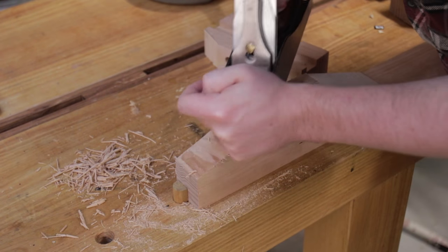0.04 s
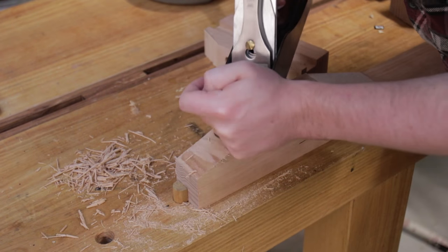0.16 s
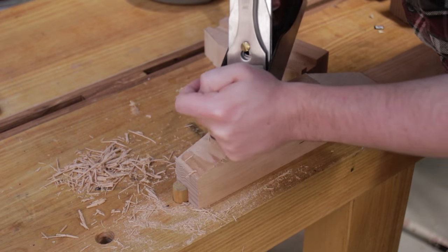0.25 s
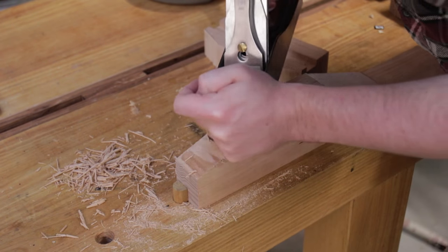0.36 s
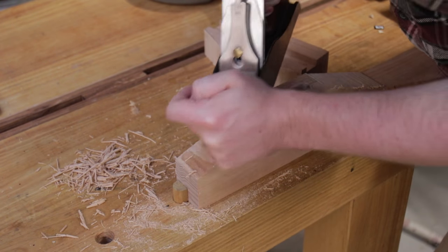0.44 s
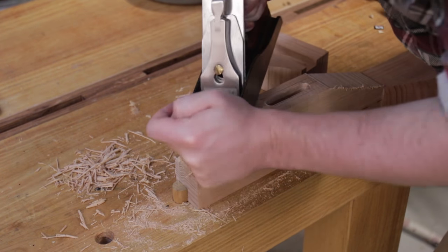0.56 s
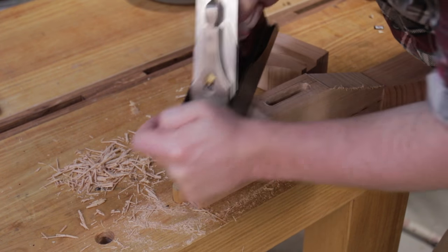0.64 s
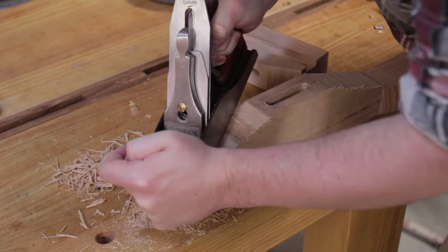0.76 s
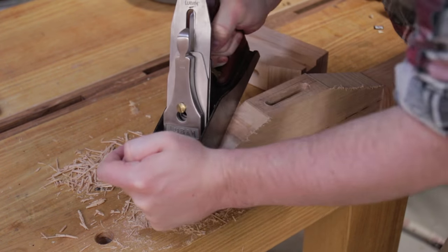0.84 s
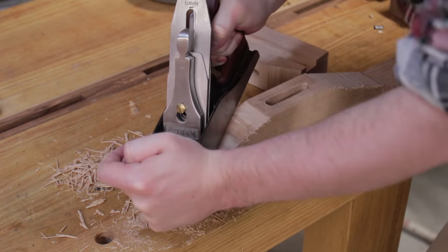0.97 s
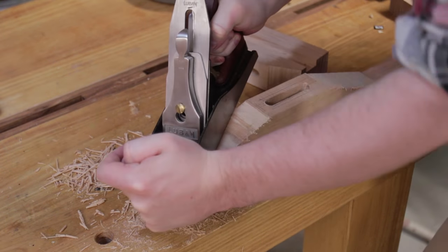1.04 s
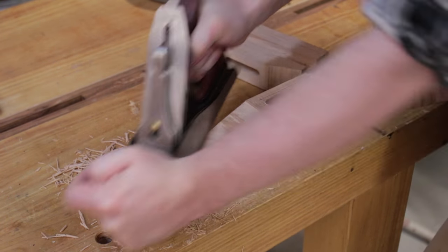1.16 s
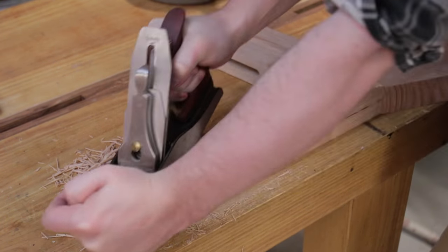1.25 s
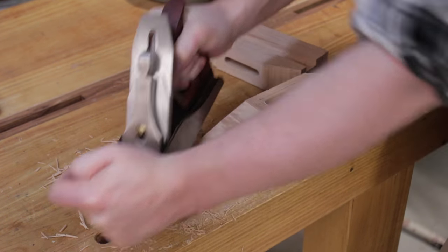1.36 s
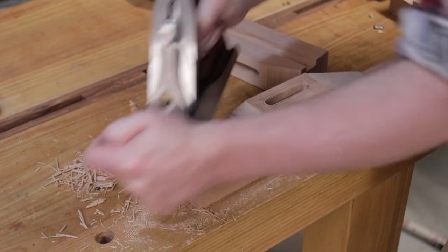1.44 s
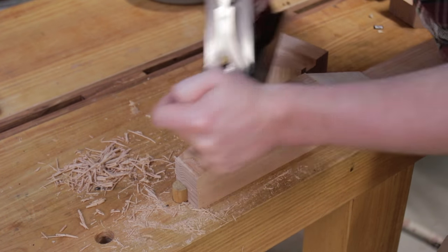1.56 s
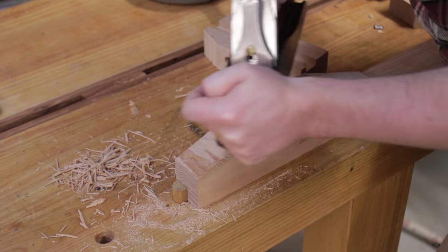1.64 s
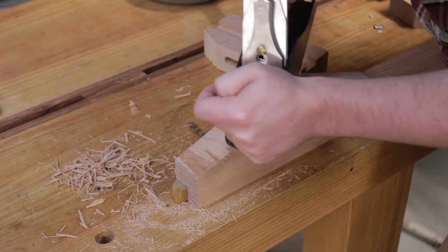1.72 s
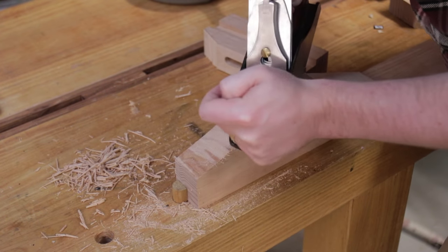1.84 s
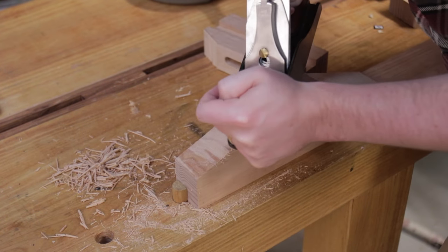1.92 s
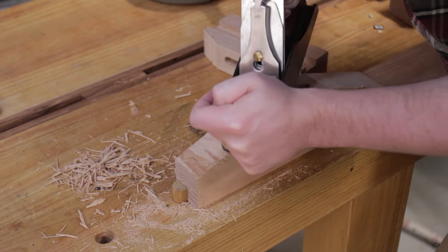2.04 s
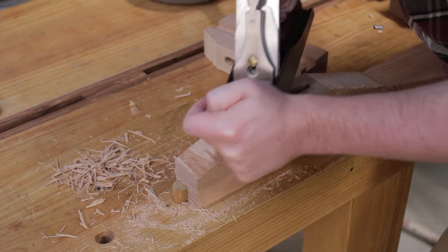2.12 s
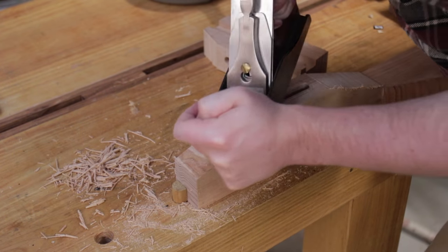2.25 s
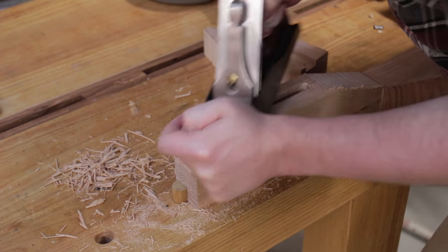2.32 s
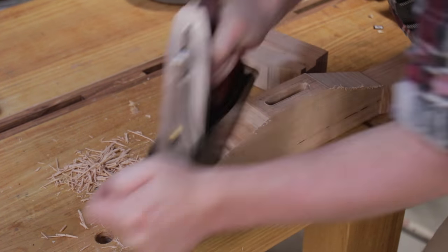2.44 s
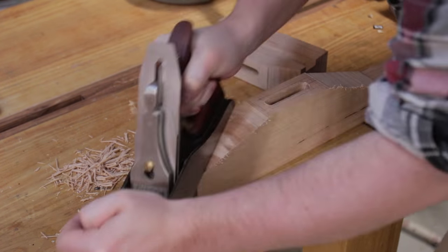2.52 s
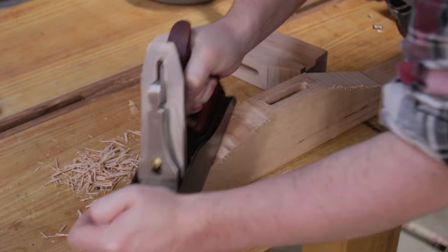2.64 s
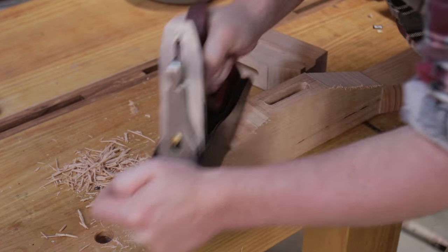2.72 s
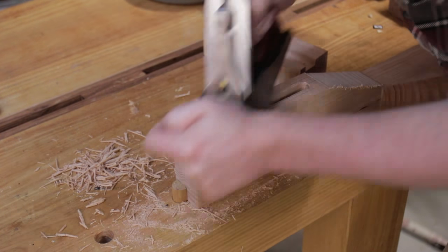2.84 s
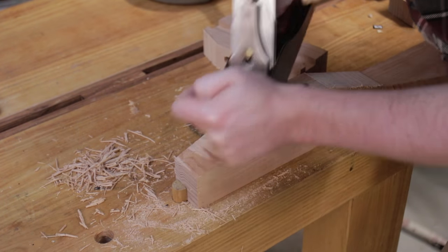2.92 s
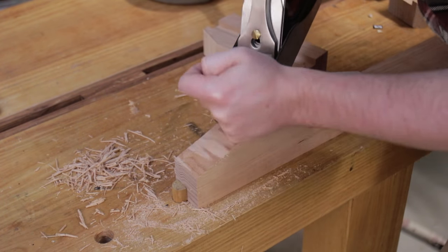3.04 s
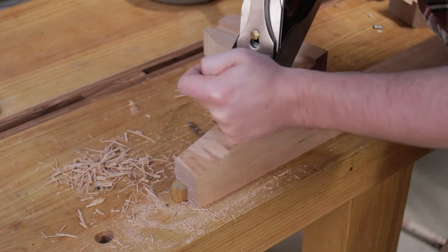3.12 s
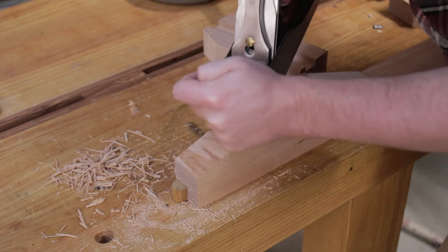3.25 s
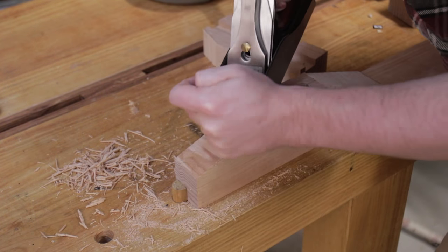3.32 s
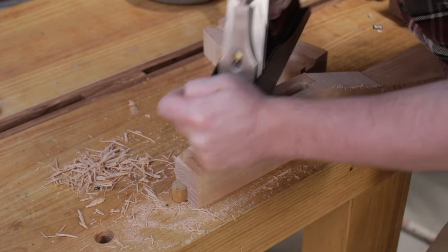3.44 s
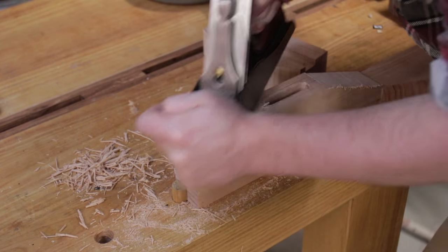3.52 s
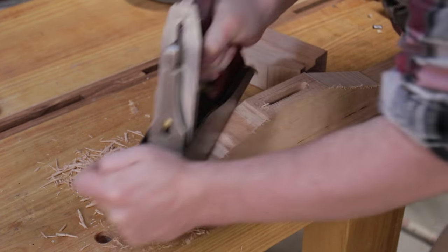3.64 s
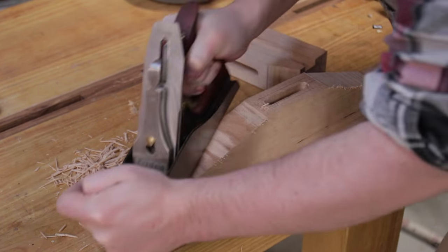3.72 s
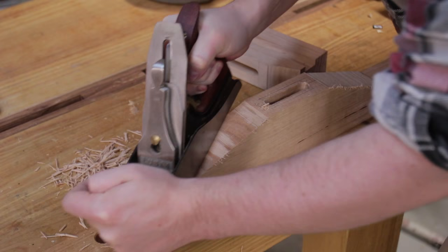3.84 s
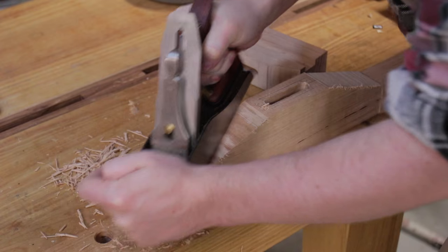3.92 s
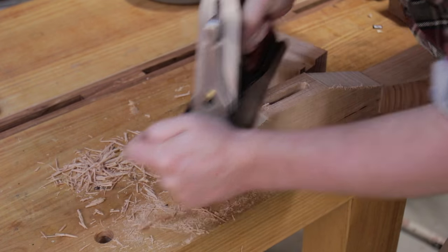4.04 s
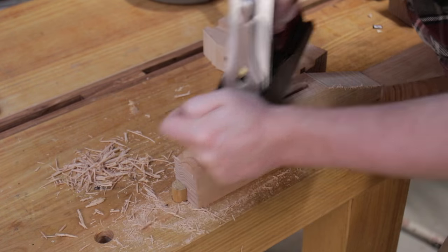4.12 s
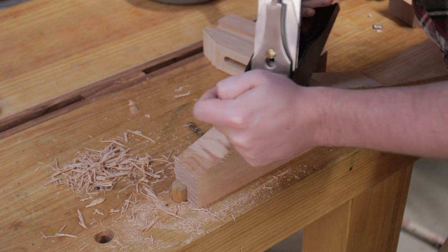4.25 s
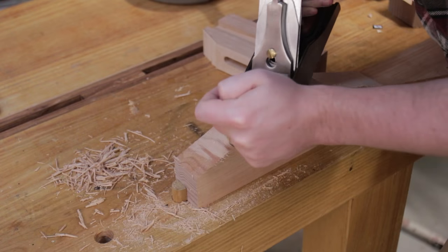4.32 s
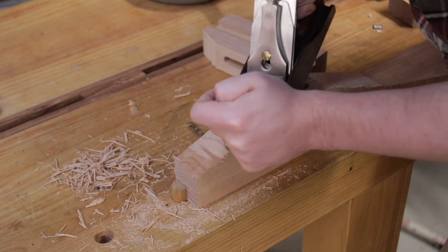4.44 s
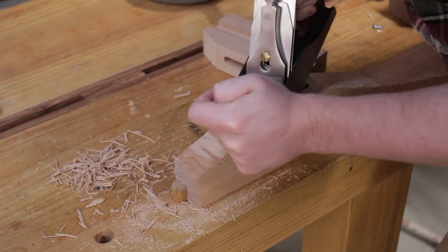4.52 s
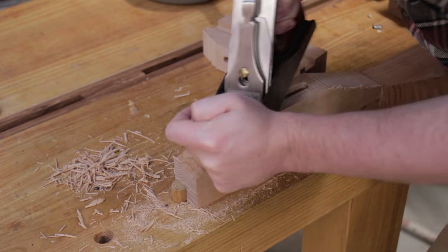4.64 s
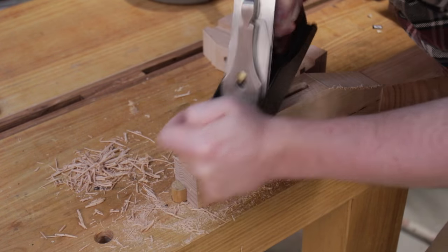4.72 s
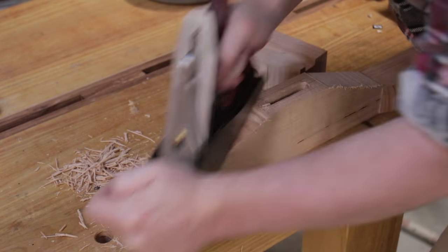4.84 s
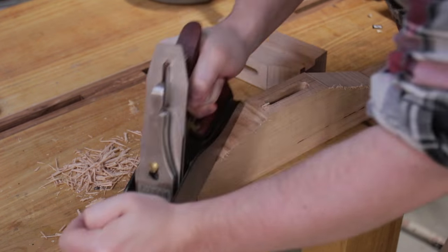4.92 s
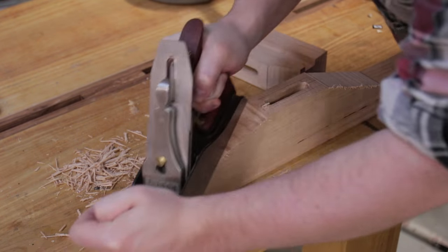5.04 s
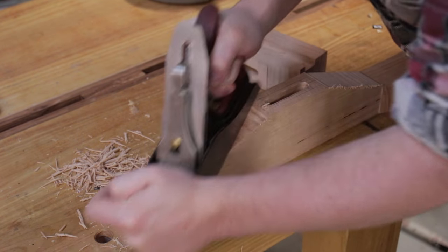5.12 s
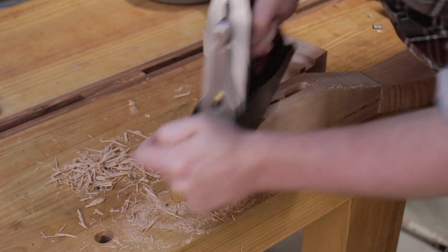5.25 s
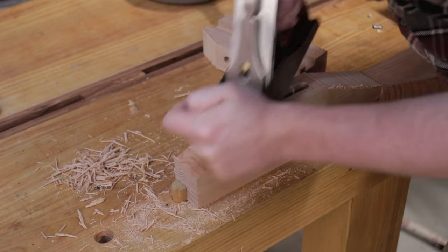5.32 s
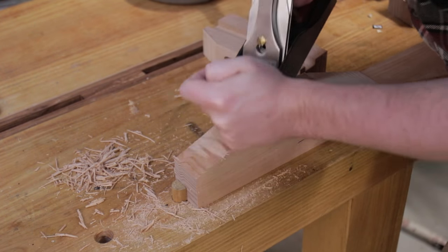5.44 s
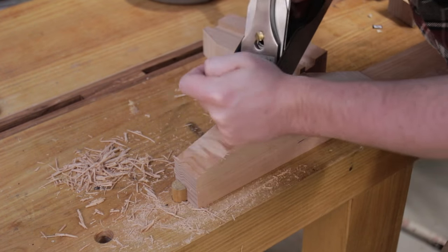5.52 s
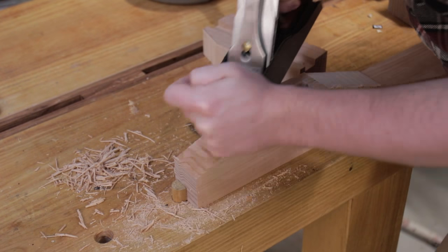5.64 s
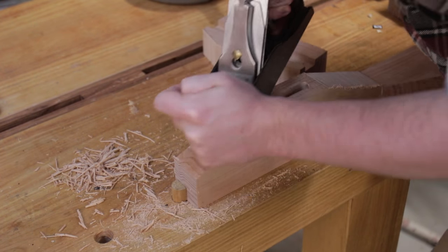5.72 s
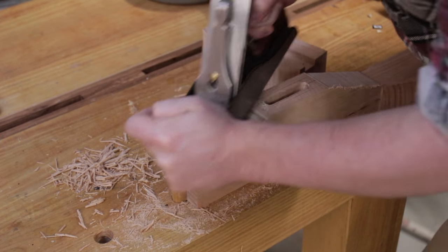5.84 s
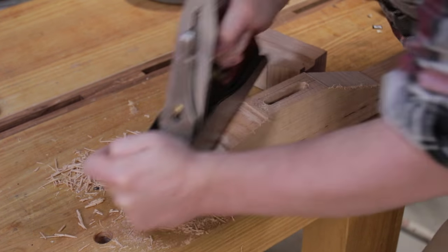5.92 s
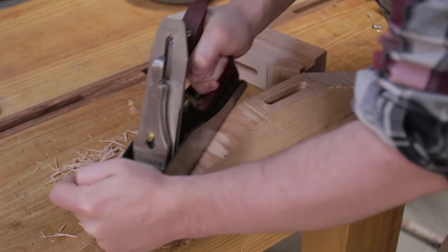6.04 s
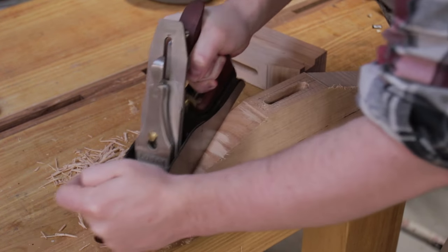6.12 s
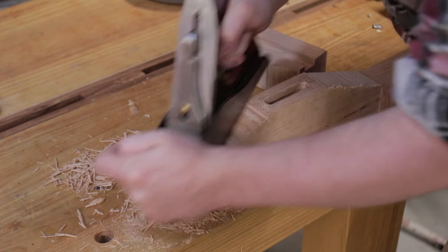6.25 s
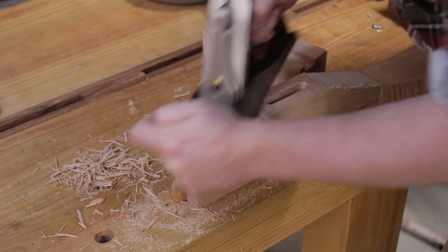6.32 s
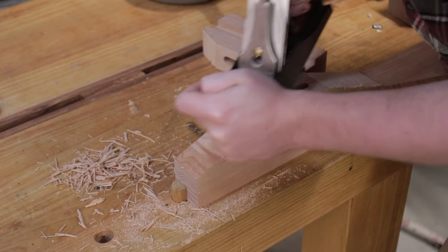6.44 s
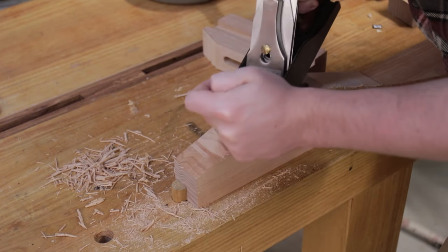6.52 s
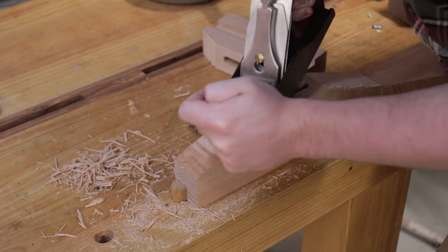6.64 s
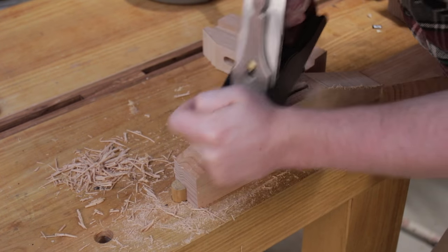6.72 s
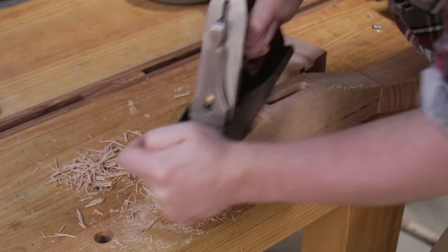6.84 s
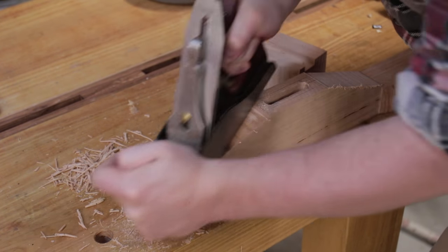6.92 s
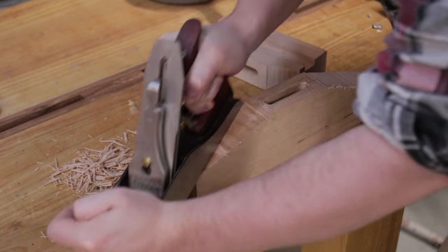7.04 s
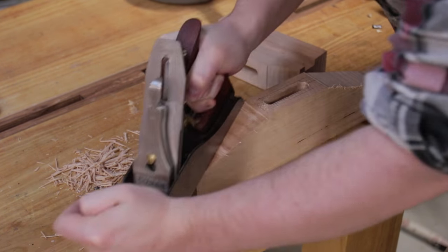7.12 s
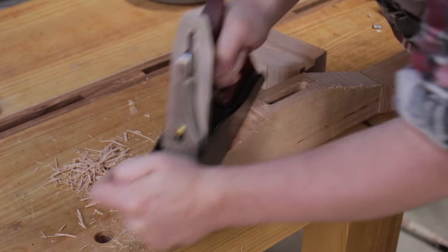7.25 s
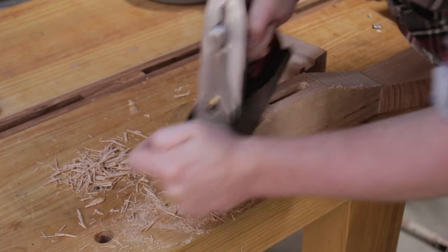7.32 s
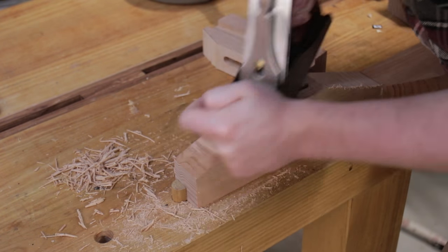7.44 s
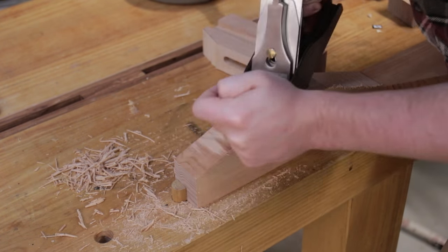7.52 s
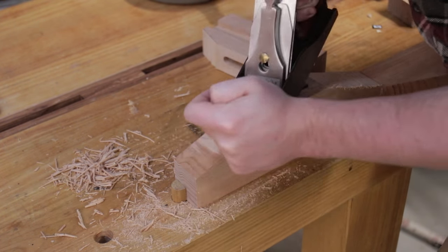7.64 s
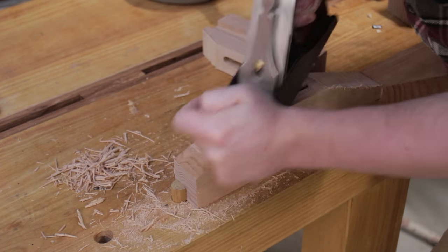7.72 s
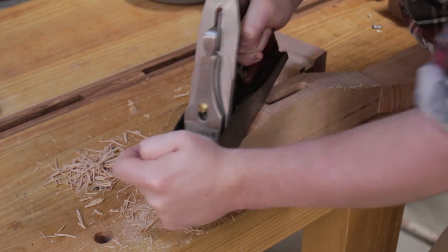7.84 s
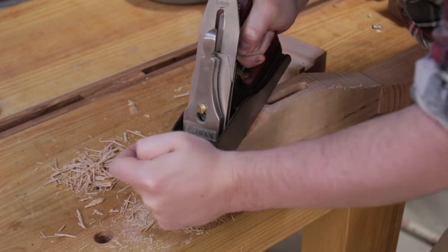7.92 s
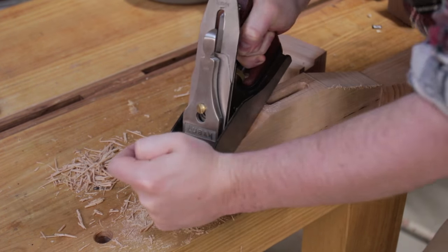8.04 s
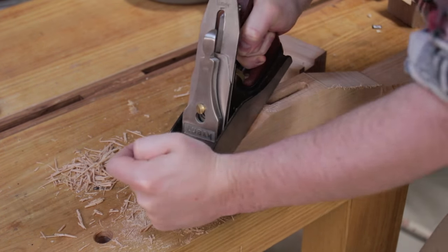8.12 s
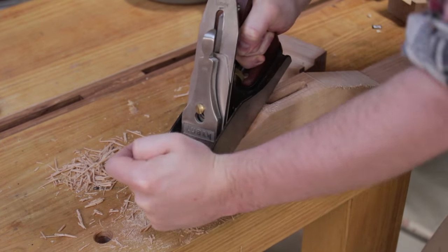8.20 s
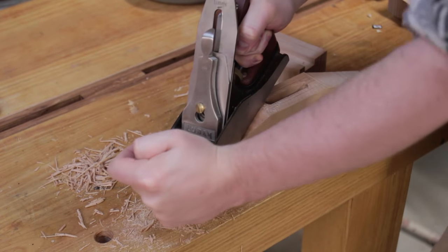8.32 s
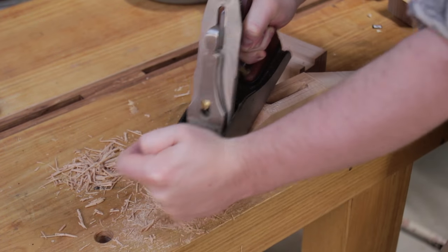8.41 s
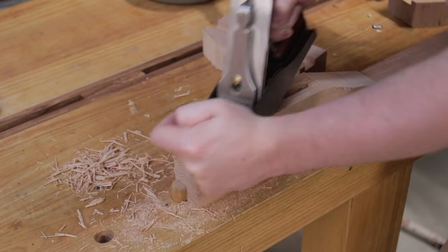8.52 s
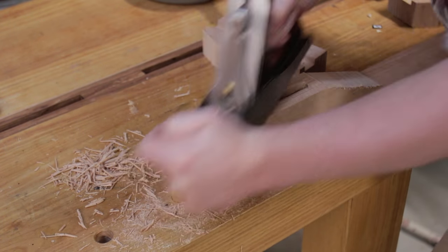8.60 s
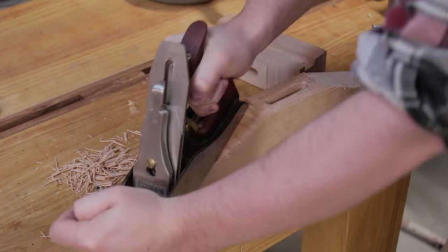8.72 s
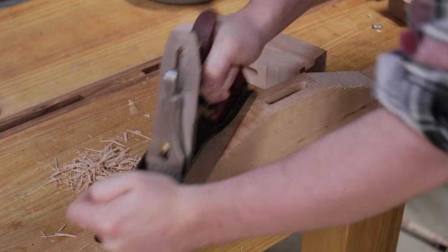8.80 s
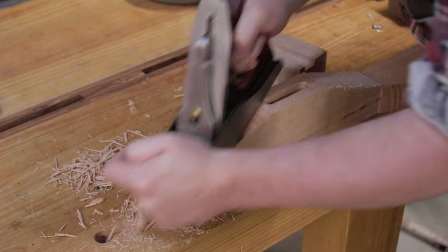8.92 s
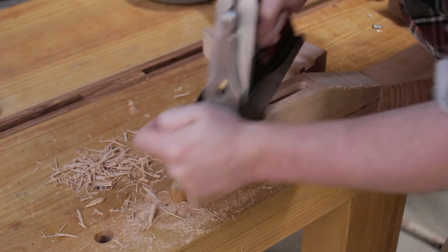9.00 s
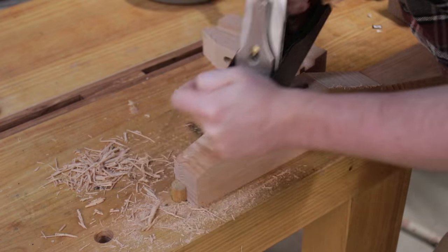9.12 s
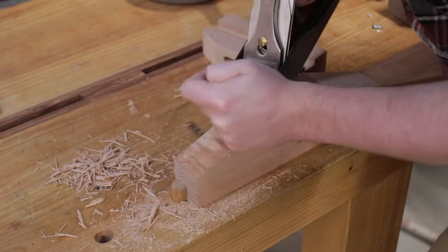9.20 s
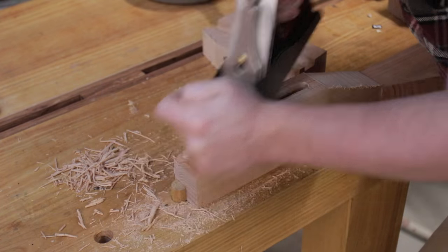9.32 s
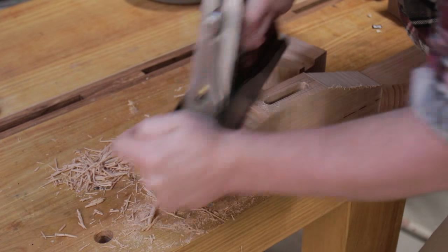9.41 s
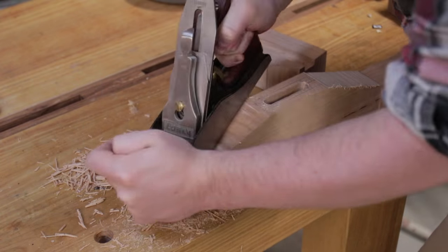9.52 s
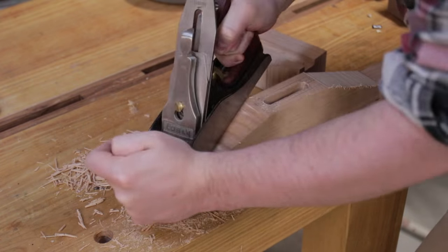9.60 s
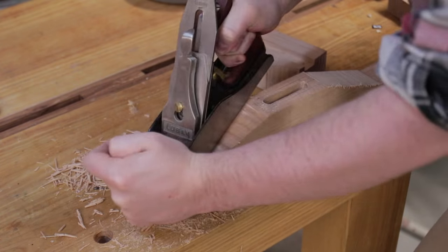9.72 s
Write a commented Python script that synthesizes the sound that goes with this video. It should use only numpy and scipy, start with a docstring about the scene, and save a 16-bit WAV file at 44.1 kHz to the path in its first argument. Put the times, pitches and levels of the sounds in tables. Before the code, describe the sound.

Close by, a hand plane drags and bites into hardwood with coarse, papery tearing over low bench rumble. An opening cluster of short strokes gives way to separate pushes, several stopped by bright, woody-metallic clacks. Softer knocks sound as the tool lands, and from the middle onward thin scraping follows on the way back. A late knock releases a short treble hiss before a final stroke. Small reverberant workshop, faint constant air.

```python
"""A metal hand plane on a hardwood block, on the bench of a small, hard-walled workshop, about ten seconds.
Short strokes come first, then single longer ones, some ended by a hard knock, with soft knocks as the plane lands.
From about four seconds, light scraping returns fall between the strokes; late on, the bare edge skids with a hiss.
Grains of noise drive the tearing, dragging and bench rumble, short swings the knocks; plane, block and bench ring.
The microphone hears them direct, over a long room tail and a steady hush."""
import sys
import numpy as np
from scipy import signal
from scipy.fft import rfft, irfft, next_fast_len
from scipy.io import wavfile
from scipy.ndimage import uniform_filter1d

SR = 44100
rng = np.random.default_rng(int(sys.argv[2]) if len(sys.argv) > 2 else 0)


def voltage_ratio(decibels):
    """Convert decibels (scalar or array-like) to amplitude ratios, 20 dB per decade."""
    exponent = np.asarray(decibels, float) / 20
    return 10 ** exponent


def dump(signal):
    """Clip the signal to [-1, 1] and save it as 16-bit WAV at the path in sys.argv[1]."""
    limited = np.clip(np.atleast_2d(signal).T, -1, 1)
    pcm = np.round(limited * 32767).astype(np.int16)
    wavfile.write(sys.argv[1], SR, pcm)


N = 430857

# plane, block and bench ringing together, before grip and place change them:
# (frequency [Hz], width [Hz], lift over the plain contact sound [dB])
MODES = [(131, 12.5, 6), (147.9, 8.3, 16.5), (199.5, 6.6, 7.5), (273, 17.7, 8), (319.8, 14, 4),
         (395.2, 45, 7), (510, 40, 4.5), (660, 90, 6), (719, 8.1, 5), (900, 60, 6.5), (1070, 84, 11),
         (1576, 56, 7.5), (1680, 150, 5), (1796, 60, 3.5), (2200, 28, -2), (2416, 41, 6), (2656, 150, 4),
         (3120, 32, 4.5), (3332, 49, 6.5), (3930, 90, 6), (4480, 420, 1), (5290, 450, 2.5), (5810, 40, 6),
         (7116, 87, 9), (8800, 400, 2.5)]
# each of three places on the wood favours other modes, those below 230 Hz vary least
GRIP_SPREAD = np.where(np.array(MODES)[:, 0] < 230, 0.15, 0.61)
GRIP = np.clip(1 + GRIP_SPREAD * rng.standard_normal((3, len(MODES))), 0, 2)


def strokes():
    """The plane pressed forward and drawn back: cutting, dragging, scraping and tearing over the bench rumble."""
    # the plane pressed along the wood; levels before the trims below:
    # (start [s], full speed [s], easing off [s], sole dragging level [dB], blade cutting level [dB])
    passes = [(0.0, -0.015, 0.073, -58.5, -72), (0.11, 0.11, 0.11, -59, -70.5),
              (0.443, 0.541, 0.54, -45.5, -58.5), (0.55, 0.598, 0.62, -45, -55.5),
              (0.676, 0.715, 0.74, -44, -53.5), (0.775, 0.782, 0.79, -39, -43.5),
              (1.15, 1.185, 1.185, -54.5, -66), (1.185, 1.199, 1.203, -42.5, -53),
              (1.892, 1.916, 1.92, -58, -78), (1.984, 2.08, 2.17, -66, -68), (2.128, 2.233, 2.24, -47, -56),
              (2.33, 2.38, 2.43, -38.5, -52), (2.425, 2.45, 2.47, -41, -47), (2.475, 2.49, 2.505, -45, -45),
              (3.38, 3.382, 3.36, -54, -57.5), (3.485, 3.5, 3.69, -40, -53.5),
              (3.665, 3.672, 3.682, -39, -38.5), (3.71, 3.737, 3.94, -43, -88),
              (4.05, 4.082, 4.06, -58, -60.5), (4.494, 4.53, 4.57, -65, -71.5),
              (4.634, 4.652, 4.74, -47, -57.5), (4.656, 4.687, 4.7, -39, -50.5),
              (4.803, 4.835, 4.913, -45, -42.5), (5.727, 5.723, 5.83, -47.5, -61),
              (5.834, 5.841, 5.85, -39, -56), (5.854, 5.913, 5.925, -36.5, -45.5),
              (5.975, 5.996, 5.995, -34, -38), (6.032, 6.055, 6.23, -43.5, -85),
              (6.64, 6.668, 6.88, -57, -66), (6.789, 6.807, 6.815, -38, -50), (6.82, 6.84, 6.89, -38, -45),
              (6.9, 6.95, 7.01, -40, -49), (7.69, 7.696, 7.73, -53, -63.5),
              (7.781, 7.816, 7.82, -36.5, -49), (7.82, 7.859, 7.93, -44.5, -43.5),
              (8.708, 8.716, 8.725, -50, -56), (8.727, 8.731, 8.745, -44, -52),
              (8.75, 8.778, 8.84, -47.5, -61), (9.368, 9.38, 9.39, -42, -51),
              (9.378, 9.425, 9.47, -42, -42), (9.47, 9.5, 9.545, -42, -43), (9.59, 9.6, 9.61, -41, -65),
              (9.62, 9.642, 9.64, -46.5, -64)]
    # the plane drawn back lightly, the edge only scraping; levels before the trims below:
    # (start [s], full speed [s], easing off [s], sole dragging level [dB])
    returns = [(4.207, 4.215, 4.27, -56.5), (8.468, 8.485, 8.53, -63), (8.533, 8.56, 8.59, -57),
               (5.274, 5.285, 5.315, -43.5), (5.325, 5.34, 5.43, -47), (6.317, 6.36, 6.48, -49),
               (7.358, 7.385, 7.52, -47), (8.99, 9.012, 9.19, -48)]
    # how a movement of the sole or the blade swells and dies:
    # (start below full level [dB], sag [dB/s], quick drop [dB], fade [dB/s])
    sole_shape = (7.7, 16.7, 2.5, 119)
    blade_shape = (7.8, 13.6, 7.3, 112)
    scrape_db = -14  # edge against sole on a return, before the trims

    forward_rows = [(*row[:4], sole_shape) for row in passes]
    return_rows = [(*row, sole_shape) for row in returns]
    cut_rows = [(*row[:3], row[4], blade_shape) for row in passes]
    cut_rows += [(*row[:3], row[3] + scrape_db, blade_shape) for row in returns]

    sole = voltage_ratio(movements(forward_rows + return_rows) - 4.3)
    edge = voltage_ratio(movements(cut_rows) + 2.4)
    forward = voltage_ratio(movements(forward_rows) - 5.6)
    back = voltage_ratio(movements([(*row, blade_shape) for row in returns]) - 3)
    return edge * cutting() + sole * dragging() + back * scraping() + tearing(forward, edge) + pushing()


def cutting():
    """Fibres snap at the edge: dense, fine grains ring the block, at rms 1."""
    # colour of the cutting force: (frequency [Hz], level [dB])
    cut_colour = [(800, -78), (2500, 2), (4000, 3.5), (7000, -2.5), (11000, -7), (16000, -21)]
    return sliding(coloured(grains(9000, 1.1, 1.8), cut_colour))


def dragging():
    """The sole chatters on the wood: coarser grains ring the block, at rms 1."""
    # colour of the dragging force: (frequency [Hz], level [dB])
    drag_colour = [(150, -28), (450, 4.3), (1000, 9), (2200, 6), (4000, -8), (9000, -60)]
    return sliding(coloured(grains(4000, 1.5, 1.95), drag_colour))


def tearing(forward, edge):
    """The shaving tears in near-regular steps, so noise through a gliding resonance sings in uneven spurts."""
    # pitch of the tearing, which stands for the blade's speed: (time [s], pitch [Hz])
    tear_pitch = [(0.45, 700), (0.53, 800), (0.62, 1600), (0.69, 1100), (0.76, 1700), (0.785, 4500),
                  (0.8, 2600), (0.83, 1300), (1.17, 1100), (1.21, 1900), (1.3, 1400), (2.13, 1100),
                  (2.24, 1500), (2.34, 1000), (2.39, 1700), (2.43, 2200), (2.47, 3500), (2.49, 5000),
                  (2.51, 1700), (3.49, 1100), (3.56, 2000), (3.62, 1400), (3.655, 2700), (3.668, 4800),
                  (3.682, 2900), (3.708, 2700), (3.72, 1100), (4.04, 1200), (4.09, 2900), (4.64, 1100),
                  (4.7, 1800), (4.8, 1100), (4.84, 3300), (4.875, 5600), (4.9, 4600), (4.912, 2600),
                  (4.94, 1100), (5.84, 1080), (5.89, 1750), (5.95, 1600), (5.98, 3600), (6.01, 2600),
                  (6.04, 1100), (6.79, 1050), (6.82, 1700), (6.855, 2650), (6.9, 2100), (6.95, 1650),
                  (6.99, 2100), (7.05, 1750), (7.79, 1150), (7.82, 1750), (7.86, 3400), (7.89, 5800),
                  (7.92, 2900), (7.945, 700), (8.7, 1500), (9.38, 1600), (9.42, 2900), (9.44, 4700),
                  (9.475, 3000), (9.53, 2700), (9.56, 1100)]
    faint_hz = 2000  # above this pitch the tearing on the sole's level thins out
    sole_share, edge_share = 1.65, 0.55
    chatter_db = 1.6  # spread as the edge bites and lets go every few ms

    hz = np.interp(np.arange(N) / SR, *np.transpose(tear_pitch))
    sung = resonate(resonate(grains(6000, 1.2, 2.1), hz, 950), hz, 1050)
    tear = sliding(sung)
    tear /= np.sqrt(uniform_filter1d(tear ** 2, 4000))  # as loud at any pitch

    bite = evened(voltage_ratio(chatter_db * wandering(150)))
    level = np.hypot(sole_share * forward * np.minimum(faint_hz / hz, 1), edge_share * edge)
    return level * bite * tear


def scraping():
    """The unloaded iron rings as it scrapes: sparse grains through its own resonances, at rms 1."""
    # ringing of the iron, levels relative to one another: (frequency [Hz], width [Hz], level [dB])
    iron_modes = [(1150, 200, -3), (1650, 200, -4), (2490, 340, 0), (3200, 340, -2), (3900, 220, -5),
                  (4910, 250, -12)]
    return evened(sum(voltage_ratio(db) * ringing(grains(2000, 2.0, 2.8), hz, width) for hz, width, db in iron_modes))


def pushing():
    """The hand shakes the bench: sparse, low-coloured grains follow the push of the hands."""
    # colour of the pushing force: (frequency [Hz], level [dB])
    push_colour = [(40, -36), (90, -0.5), (140, 0.5), (400, 0), (800, -5.5), (2500, -110)]
    return voltage_ratio(leaning() - 1) * sliding(coloured(grains(1500, 1.7, 1.04), push_colour))


def leaning():
    """Level of the push [dB]: it builds, peaks and settles; after a landing it starts at once."""
    # the hands' push at its strongest, before smoothing and trim: (time [s], level [dB])
    pushes = [(0.0, -48), (0.614, -49.5), (0.8, -51), (1.234, -56.5), (1.89, -48.5), (2.3, -55.5),
              (2.542, -43.5), (3.09, -54), (3.55, -50.5), (3.74, -44.5), (3.95, -48), (4.22, -50.5),
              (4.692, -55.5), (4.96, -44.5), (5.3, -48), (5.452, -49.5), (5.76, -50), (5.95, -50.5),
              (6.143, -48), (6.47, -45), (6.902, -50), (7.4, -45.5), (7.95, -45.5), (8.349, -65),
              (8.774, -46.5), (9.04, -50), (9.147, -46), (9.42, -48.5), (9.5, -44.5), (9.6, -46)]
    # no push reaches the bench before the plane is down: time of landing [s]
    landings = [1.876, 3.07, 5.28, 5.733, 7.368, 9.377]
    build_db_per_s, settle_db_per_s = 106, 98

    out, t = np.full(N, -110.), np.arange(N) / SR
    for s, db in pushes:
        down = max([0] + [landing for landing in landings if landing <= s])
        shape = db - np.where(t < s, build_db_per_s * (s - t), settle_db_per_s * (t - s))
        out = np.maximum(out, np.where(t >= down, shape, -110))
    return uniform_filter1d(out, 200)


def movements(rows):
    """Level [dB]: each row (start, full, ease, dB, shape) takes over from the last: swell, sag, quick drop, fade."""
    drop_s, climb_db_per_s = 0.022, 202  # a slow swell starts lower
    out, t = np.full(N, -110.), np.arange(N) / SR
    for start, full, ease, db, (under, sag, drop, fade) in sorted(rows):
        k = round(start * SR)
        u = t[k:k + SR]
        late = np.maximum(u - ease, 0)
        lowest = db - under - climb_db_per_s * (full - start)
        swell = np.interp(u, [start, full], [max(out[k], lowest), db])
        sagging = sag * np.clip(u - full, 0, max(ease - full, 0))
        dropping = drop * (1 - np.exp(-late / drop_s))
        out[k:k + SR] = swell - sagging - dropping - fade * late
    return uniform_filter1d(out, 200)


def skid():
    """The bare edge skids: a burst of fine treble noise that dies quickly."""
    # the one skid: (time [s], level at its start [dB], t60 [s])
    burst = (8.729, -46, .26)
    s, db, t60 = burst
    t = np.arange(N) / SR - s
    hiss = evened(coloured(rng.standard_normal(N), [(4000, -34), (8000, 1), (12000, 1), (16000, -22)]))
    return voltage_ratio(db - 60 * np.maximum(t, 0) / t60) * (t >= 0) * hiss


def knocks():
    """Each blow is a short swing around its own pitch with small rebounds, and rings the modes near it."""
    # landings and snaps: (time [s], peak level before the room [dB], pitch of the contact [Hz])
    blows = [(0.107, -43, 2460), (0.108, -43, 800), (0.523, -39, 620), (0.612, -40, 2500),
             (0.689, -40, 1100), (0.794, -25, 2900), (1.189, -40, 1500), (1.8755, -39, 1400),
             (1.876, -36, 165), (2.108, -45, 492), (2.4965, -20, 3600), (2.503, -34, 1100),
             (2.53, -37, 430), (3.070, -42, 1100), (3.084, -36.5, 430), (3.153, -38, 1000),
             (3.162, -39, 450), (3.267, -51, 450), (3.384, -44, 1910), (3.711, -19.5, 2100),
             (3.714, -26, 950), (4.087, -45, 2900), (4.212, -42, 700), (4.807, -30, 1070),
             (4.906, -30.5, 2640), (4.914, -32, 420), (5.28, -42, 220), (5.283, -42, 2600),
             (5.305, -39, 3100), (5.4, -42, 1600), (5.733, -38, 900), (5.841, -36, 1100),
             (6.037, -21, 1900), (6.039, -29, 800), (6.335, -45, 2500), (6.797, -36, 1100),
             (7.363, -47, 2400), (7.368, -31, 260.6), (7.371, -39, 900), (8.28, -55, 452),
             (8.729, -24.5, 1900), (8.744, -33.5, 400), (8.993, -47, 2500), (9.377, -34, 1550),
             (9.591, -26, 1000), (9.595, -27, 1300)]
    contact_cycles = 1.1  # swings in one contact
    rattle_t60_s, rattle_db = 0.09, -2.5  # the small rebounds
    freedom = 1.15  # a blow rings the modes more freely than a pressed sole

    out, t = np.zeros(N + SR), np.arange(2048) / SR
    for s, db, hz in blows:
        u = hz * t  # time in cycles
        force = u ** 2 * np.exp(-4.0 * u / contact_cycles) * np.sin(2 * np.pi * u)

        after = np.minimum(0.6 / hz + 0.016 * rng.random(8), 1499 / SR)
        bounces = np.zeros(1500)
        bounces[(after * SR).astype(int)] = rng.uniform(-1, 1, 8) * voltage_ratio(rattle_db - 60 * after / rattle_t60_s)
        bounces[0] = 1

        blow = body(np.pad(np.convolve(force, bounces), (0, 9000)), freedom)
        start = round(s * SR)
        out[start:start + len(blow)] += voltage_ratio(db) * blow / abs(blow).max()
    return out[:N]


def body(force, grip, shift=0):
    """The force passes every mode in turn, each lifting its own band as far as the grip allows."""
    hz, width, db = np.transpose(MODES)
    hz = hz * (1 + shift * (hz > 230))  # the lowest modes stay put
    lift, w = voltage_ratio(db * grip / 2), 2 * np.pi * hz / SR
    a = np.sin(w) * width * lift / (2 * hz)
    middle = -2 * np.cos(w)
    sections = np.array([1 + a * lift, middle, 1 - a * lift, 1 + a / lift, middle, 1 - a / lift])
    return signal.sosfilt(np.ascontiguousarray((sections / sections[3]).T), force)


def sliding(force):
    """As the plane travels, the ringing fades round three places on the wood; rms 1."""
    travel = 5.0 * np.arange(N) / SR  # five rounds a second
    drift = 0.018  # share by which the modes shift from place to place
    out = np.zeros(N)
    for k in range(3):
        nearness = np.cos(np.pi * (travel - k / 3)) ** 2
        out += nearness * body(force, GRIP[k], drift * (k - 1))
    return evened(out)


def grains(per_s, spread_db, clump_db):
    """Fibres giving way at random moments, in clumps some 10 ms long."""
    size = voltage_ratio(spread_db * np.minimum(rng.exponential(1, N), 4))
    struck = rng.random(N) < per_s / SR
    return voltage_ratio(clump_db * wandering(400)) * size * rng.standard_normal(N) * struck


def wandering(samples):
    """Noise smoothed twice over so many samples, at rms 1."""
    return evened(uniform_filter1d(uniform_filter1d(rng.standard_normal(N), samples), samples))


def resonate(x, hz, width):
    """Shifts the curve hz down to zero, smooths, and shifts back: a resonance of gain 1."""
    turn = np.exp(2j * np.pi * np.cumsum(hz) / SR)
    r = np.exp(-np.pi * width / SR)
    return 2 * (turn * signal.lfilter([1 - r], [1, -r], x / turn)).real


def ringing(x, hz, width):
    """A steep fixed resonance, scaled to rms 1."""
    peak = signal.iirpeak(hz, hz / (1.5 * width), SR)  # wider, as two passes narrow it
    return evened(signal.lfilter(*peak, signal.lfilter(*peak, x)))


def evened(x):
    """Scales to rms 1."""
    return x / np.sqrt(np.mean(x ** 2) + 1e-20)


def read(points, hz):
    """Reads a table on a log-frequency axis."""
    f, value = np.transpose(points)
    return np.interp(np.log(hz + 1), np.log(f + 1), value)


def coloured(x, points):
    """Filters by a spectrum table."""
    size = next_fast_len(len(x))
    gain = voltage_ratio(read(points, np.fft.rfftfreq(size, 1 / SR)))
    return irfft(rfft(x, size) * gain, size)[:len(x)]


def room(x):
    """Sparse taps of random sign that build up over the first echoes, each band dying at its own speed."""
    # decay of the workshop: (frequency [Hz], t60 [s])
    decay = [(120, 0.36), (330, 0.76), (870, 0.48), (2300, 0.8), (6000, 0.84), (12000, 0.31)]
    # what the walls send back: (frequency [Hz], level [dB])
    walls = [(150, 0), (1500, -1.5), (4000, -14), (12000, -20)]
    taps = np.zeros(SR)
    at = np.arange(300, SR - 20, 20)
    build_up = 1 - np.exp(-at / SR / 0.025)
    taps[at + rng.integers(0, 20, len(at))] = rng.choice([-1., 1.], len(at)) * build_up
    hz, t, z = signal.stft(taps, SR, nperseg=256)
    tail = signal.istft(z * voltage_ratio(-60 * t / read(decay, hz)[:, None]), SR, nperseg=256)[1]
    return signal.fftconvolve(coloured(x, walls), tail / np.linalg.norm(tail))[:N]


def air():
    """The quiet steady hush of the workshop and the microphone: coloured noise at -72 dB rms."""
    # colour of the hush: (frequency [Hz], relative level [dB])
    hush = [(15, -47), (25, -3.5), (128, 8.5), (2630, -9.5), (2930, -11), (4040, -10.5), (4380, -10.5),
            (5570, -14.5), (11200, -18), (15000, -41)]
    return voltage_ratio(-72) * evened(coloured(rng.standard_normal(N), hush))


def scene():
    """The plane at work, direct and round the room, over the hush."""
    rub, hits = strokes() + skid(), knocks()
    echo = room(voltage_ratio(-7.0) * rub + voltage_ratio(-2.6) * hits)
    return (rub + hits + echo + air())[None]


def band_limit(x):
    """A steep low-pass at the top of the band."""
    return signal.sosfilt(signal.butter(12, 15700, fs=SR, output="sos"), x)


def record(dry):
    """The microphone drops the deep bass, below 40 Hz."""
    thin = signal.sosfilt(signal.butter(2, 40, "highpass", fs=SR, output="sos"), dry)
    return band_limit(thin)


dry = scene()
out = record(dry)
dump(out)
```